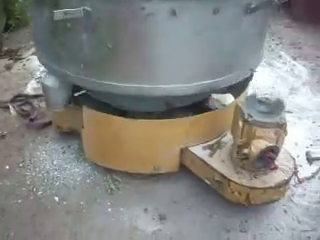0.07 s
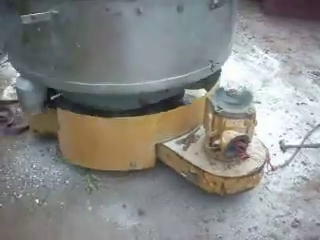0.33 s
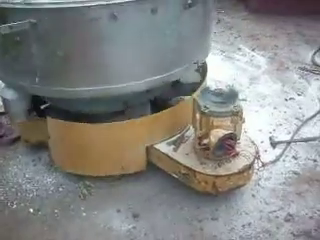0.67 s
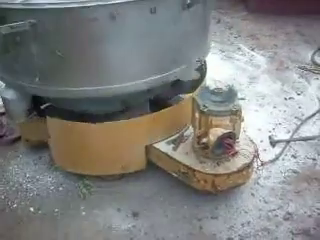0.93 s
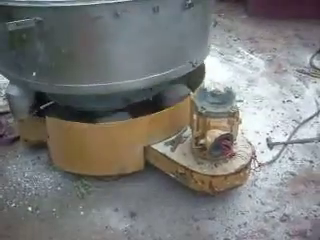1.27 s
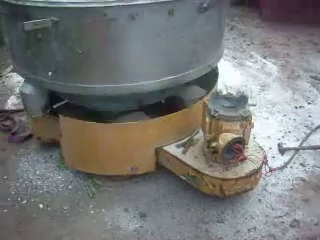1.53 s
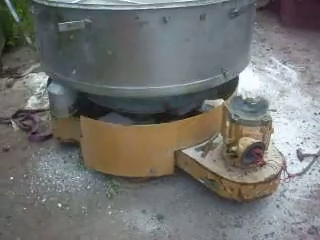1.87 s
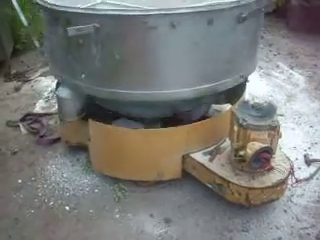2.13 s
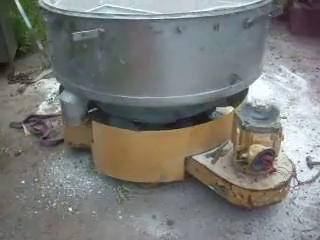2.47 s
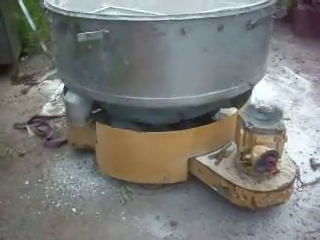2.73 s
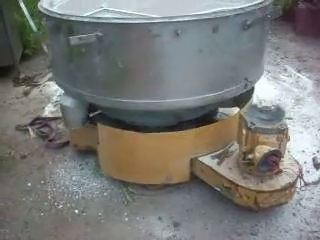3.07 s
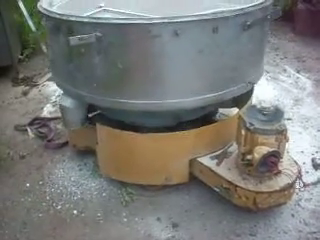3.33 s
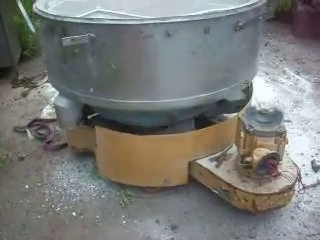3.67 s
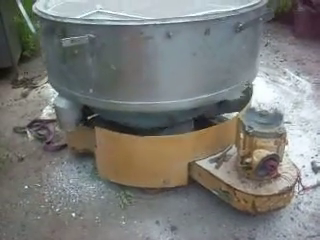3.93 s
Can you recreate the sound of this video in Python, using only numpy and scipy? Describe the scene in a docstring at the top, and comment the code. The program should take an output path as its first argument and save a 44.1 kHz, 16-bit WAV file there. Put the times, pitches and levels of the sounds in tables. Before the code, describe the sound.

A motor-driven sifter clatters outdoors from the start until the end at about 4 seconds. Roughly every 0.55 seconds the pattern repeats: sharp steel clacks, then brief metal scrapes, with low thumps and hollow knocks from the shaking drum and frame. Underneath, the drive churns with a steady, gritty rumble. The sound is narrow, with little treble, and the loudest clacks are slightly flattened.

```python
"""Steel clacks, scrapes and thumps in a rhythm that comes round a little under twice a second:
a round motor-driven sifter shaking on open ground. In every turn of its wobble the drum thumps on
its springs and knocks the frame, loose steel parts strike and rub, and the drive churns underneath.
A small narrow-band microphone with a fast limiter flattens the loudest clacks."""
import sys
import numpy as np
from scipy import signal
from scipy.fft import rfft, irfft
from scipy.io import wavfile
from scipy.ndimage import uniform_filter1d

SR = 44100
rng = np.random.default_rng(int(sys.argv[2]) if len(sys.argv) > 2 else 0)


def int16_out(signal):
    """Quantize to a 16-bit WAV file."""
    q = np.round(np.clip(np.atleast_2d(signal).T, -1, 1) * 32767)
    wavfile.write(sys.argv[1], SR, q.astype(np.int16))


N = 176400
T = np.arange(N) / SR

# Start of each turn of the drum's wobble, in seconds.
TURN_STARTS_S = [-0.466, 0.0815, 0.6298, 1.1775, 1.7255, 2.2725, 2.8197, 3.368, 3.9152]
# Spectrum of rubbing steel. Each row: frequency in Hz, level in dB.
SCRAPE_SPECTRUM = [(200, -15), (450, -2), (650, 3), (900, 4), (1050, -1), (1220, 5), (1420, -8), (1720, -2),
                   (1980, -7), (2350, -1), (3500, -1), (4300, -8), (5000, -45)]
STEEL_RISE_S = .005


def amp(db):
    """Decibels to gain."""
    return 10 ** (np.asarray(db) / 20)


def unit(x):
    """Scale to unit rms."""
    return x / np.sqrt(np.mean(x ** 2) + 1e-20)


def lookup(points, hz):
    """Interpolate a table on a log-frequency axis."""
    f, value = np.transpose(points)
    return np.interp(np.log(hz + 1), np.log(f + 1), value)


def add(mix, start_s, sound):
    """Mix a sound in, dropping what falls outside."""
    at = round(start_s * SR)
    sound = sound[max(-at, 0):]
    part = mix[max(at, 0):][:len(sound)]
    part += sound[:len(part)]


def colour(x, spectrum, size=8192):
    """Minimum-phase filter with the given spectrum."""
    log_gain = np.log(amp(lookup(spectrum, abs(np.fft.fftfreq(size, 1 / SR)))))
    taps = np.fft.ifft(np.exp(np.conj(signal.hilbert(log_gain)))).real[:size // 2]
    return signal.oaconvolve(x, taps)[:len(x)]


def ring(modes, rise_s):
    """Decaying modes that take a moment to build up."""
    t = T[:SR // 5]
    tones = sum(amp(db) * np.exp(-np.log(1000) * t / t60_s) * np.sin(2 * np.pi * hz * t)
                for hz, db, t60_s in modes)
    return (1 - np.exp(-(t / rise_s) ** 2)) * tones


def drive(churn_db=-24.4, grit_db=-35, rumble_db=-30, flutter_db=1.8, flutter_s=.008, ticks_per_s=160):
    """Fluttering bearing noise, gritty ticks and a gear rumble that repeats every turn."""
    # Each row of both: frequency in Hz, level in dB.
    bearing_spectrum = [(20, -18), (60, -10), (160, -8), (260, 0), (390, -7), (440, -3), (490, -5),
                        (720, -1), (930, -2), (1080, -12), (1220, -8), (1400, -17), (1750, -11),
                        (1980, -15), (2280, -9), (3000, -14.5), (3700, -13), (4300, -19), (5000, -55)]
    gear_spectrum = [(12, -15), (30, -2), (42, -9), (56, -3), (72, 4), (98, -5), (130, 1), (170, -1),
                     (215, -2), (268, 2), (400, -8), (700, -25), (2000, -50)]
    flutter = unit(uniform_filter1d(rng.standard_normal(N), int(flutter_s * SR)))
    churn = unit(colour(rng.standard_normal(N) * amp(flutter_db * flutter), bearing_spectrum))
    impulses = rng.standard_normal(N) * (rng.random(N) < ticks_per_s / SR)
    tick = rng.standard_normal(SR // 20) * np.exp(-T[:SR // 20] / .003)
    grit = unit(colour(signal.oaconvolve(impulses, tick)[:N], SCRAPE_SPECTRUM))
    one_turn = rng.standard_normal(round(np.mean(np.diff(TURN_STARTS_S)) * SR))
    gears = np.zeros(N)
    for turn_s in TURN_STARTS_S:
        add(gears, turn_s, one_turn)
    rumble = unit(colour(gears, gear_spectrum))
    return amp(churn_db) * churn + amp(grit_db) * grit + amp(rumble_db) * rumble


def frame(thump_db=-11.5, knock_db=-13, detune=.03, spread_db=1.2, jitter_s=.0005):
    """The swinging drum thumps on its springs and knocks the hollow frame."""
    # Each row of both: seconds into the turn, level in dB.
    thumps = [(-0.024, 1), (0.084, -4), (0.141, 2.5), (0.252, 2), (0.358, -6), (0.420, 1.5)]
    knocks = [(0.005, -3), (0.020, 1.5), (0.099, -1), (0.127, -1), (0.156, -2), (0.275, -5), (0.292, 1.5),
              (0.374, -6), (0.397, -3), (0.432, -5), (0.455, -6)]
    # Each row of both: frequency in Hz, level in dB, T60 in seconds.
    spring_modes = [(30, -17, .2), (68, 0, .15), (80, -12, .1), (130, -12, .07)]
    frame_modes = [(128, -6, .1), (180, -8, .06), (268, -1, .12), (302, 1, .08), (348, -5, .06)]
    out = np.zeros(N)
    thump = ring(spring_modes, rise_s=.02)
    for turn_s in TURN_STARTS_S:
        for at_s, db in thumps:
            add(out, turn_s + at_s, amp(thump_db + db) * thump)
        for at_s, db in knocks:
            modes = [(hz * (1 + detune * rng.normal()), mode_db + spread_db * rng.normal(), t60_s)
                     for hz, mode_db, t60_s in frame_modes]
            knock = amp(knock_db + db) * ring(modes, rise_s=.006)
            add(out, turn_s + at_s + jitter_s * rng.normal(), knock)
    return out


def sheet_steel(crack_gain=.5, crack_s=.005, body_hz=1400):
    """Response of one spot: a crack, then dense modes, the treble at once, the low ones later."""
    # Each row: frequency in Hz, T60 in seconds.
    decay_times = [(300, .15), (900, .15), (1700, .11), (3000, .1), (4200, .09)]
    hz, t, noise = signal.stft(rng.standard_normal(8192), SR, nperseg=128)
    hz = hz[:, None]
    crack = 1 + crack_gain * np.exp(-t / crack_s)
    rise = 1 - np.exp(-(t + 1 / SR) / STEEL_RISE_S) / (1 + (hz / body_hz) ** 4)
    decay = np.exp(-np.log(1000) * t / lookup(decay_times, hz))
    return unit(signal.istft(noise * crack * rise * decay, SR, nperseg=128)[1])


def contacts(force, rate_per_s=2500):
    """Tiny random metal contacts under a force curve, at unit energy."""
    hits = force * rng.standard_normal(len(force)) * (rng.random(len(force)) < rate_per_s / SR)
    return hits / (np.linalg.norm(hits) + 1e-12)


def drum(blows, spectrum, dense_db, notes_db):
    """Contacts excite the dense steel modes and the clear notes of the drum wall."""
    # Each row: frequency in Hz, level in dB, T60 in seconds.
    wall_modes = [(717, 1, .15), (873, 1, .14), (920, -3, .1), (1052, -4, .11), (1208, 0, .14),
                  (1235, -2, .1), (1305, -4, .13), (1688, -3, .12), (2317, -6, .07), (2700, -6, .07),
                  (3040, -5, .07), (3205, -2, .09), (3620, -6, .07)]
    dense, force = np.zeros(N), np.zeros(N)
    for start_s, hits in blows:
        add(dense, start_s, signal.fftconvolve(hits, sheet_steel()))
        add(force, start_s, hits)
    notes = signal.oaconvolve(force, ring(wall_modes, STEEL_RISE_S))[:N]
    return amp(dense_db) * unit(colour(dense, spectrum)) + amp(notes_db) * unit(notes)


def scrapes(lead_s=.1):
    """Steel rubs on steel in every turn, swelling and fading."""
    # Each row: peak in seconds into the turn, level in dB, rise and fall in seconds.
    rubs = [(0.276, -6, .004, .007), (0.385, -11, .012, .012), (0.4115, .5, .007, .0035)]
    t = T[:SR // 5] - lead_s
    blows = []
    for turn_s in TURN_STARTS_S:
        for peak_s, db, rise_s, fall_s in rubs:
            force = np.exp(np.minimum(t / rise_s, -t / fall_s))
            blows.append((turn_s + peak_s - lead_s, amp(db) * contacts(force)))
    return drum(blows, SCRAPE_SPECTRUM, dense_db=-24.4, notes_db=-29)


def clacks(first_contact=.9):
    """Steel parts strike the drum: a hard first contact, then quickly dying chatter."""
    # Each row: seconds into the turn, level in dB, chatter decay in seconds.
    turn_clacks = [(-0.002, -14, .002), (0.0017, -.5, .003), (0.105, -10.5, .003), (0.1145, .3, .005),
                   (0.133, -2.7, .004)]
    # A loose part with its own timing. Each row: start in seconds, level in dB, chatter decay in seconds.
    loose_clacks = [(0.1136, -5, .009), (0.2585, .5, .006), (0.6694, -10, .006), (0.682, -9.5, .006),
                    (0.8075, 0, .004), (1.2224, -4, .007), (1.3523, 0, .006), (1.755, -11, .004),
                    (1.7664, -7.5, .008), (1.8935, 2, .004), (2.3072, -3, .008), (2.4562, 1, .006),
                    (2.8529, 1, .005), (2.9932, 2, .006), (3.4007, 1, .006), (3.5374, 2, .006),
                    (3.9464, 2.5, .007)]
    # Each row: frequency in Hz, level in dB.
    clack_spectrum = [(200, -20), (480, -11), (620, -1), (760, 0), (880, 4), (1000, 1), (1120, -3),
                      (1250, 2), (1400, -7), (1530, -8), (1700, -1), (2020, -5), (2320, 1), (2850, -.5),
                      (3200, 1), (3700, .5), (4400, 1), (5200, -40)]
    regular = [(turn_s + at_s, db, chatter_s)
               for turn_s in TURN_STARTS_S for at_s, db, chatter_s in turn_clacks]
    t = T[:SR // 10]
    blows = []
    for start_s, db, chatter_s in regular + loose_clacks:
        hits = contacts(np.exp(-t / chatter_s))
        hits[0] += first_contact
        blows.append((start_s, amp(db) * hits))
    return drum(blows, clack_spectrum, dense_db=-13.5, notes_db=-22)


def scene():
    """The whole sifter, in mono."""
    return (clacks() + scrapes() + frame() + drive())[None]


def record(dry, mic_hz=4080, slope_hz=118, ceiling=.72, release_db_per_s=700, cutoff_hz=16200):
    """Narrow-band microphone, instant limiter that spits on peaks, final low-pass."""
    hz = np.fft.rfftfreq(2 * N, 1 / SR)
    rolloff = 1 + np.exp(np.minimum((hz - mic_hz) / slope_hz, 50))
    mic = irfft(rfft(dry[0], 2 * N) / rolloff)[:N]
    over_db = 20 * np.log10(np.maximum(abs(mic) / ceiling, 1))
    release_db = release_db_per_s * T
    reduction_db = np.maximum.accumulate(over_db + release_db) - release_db
    lowpass = signal.firwin(511, cutoff_hz, window=("kaiser", 9), fs=SR)
    return signal.oaconvolve(mic / amp(reduction_db), lowpass, "same")[None]


dry = scene()
out = record(dry)
int16_out(out)
```